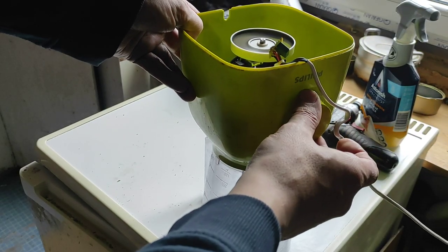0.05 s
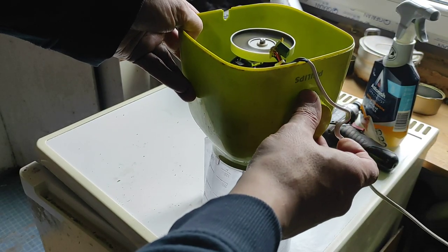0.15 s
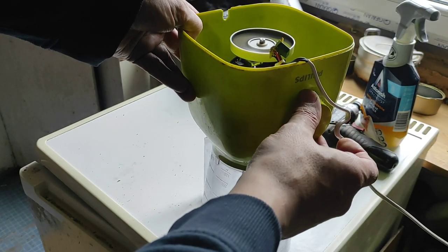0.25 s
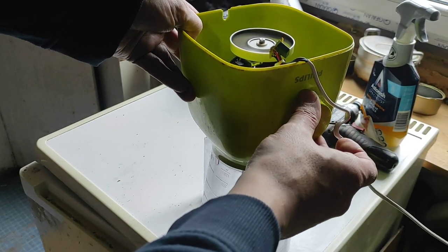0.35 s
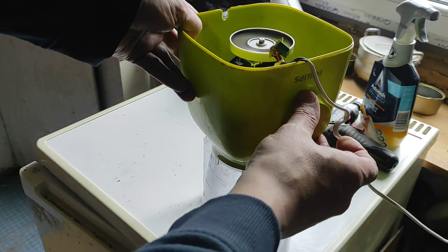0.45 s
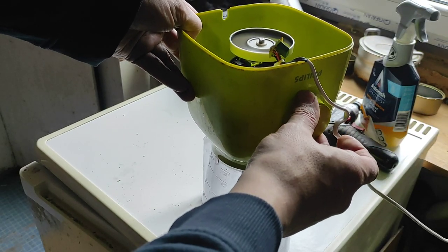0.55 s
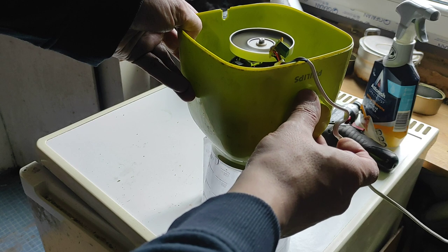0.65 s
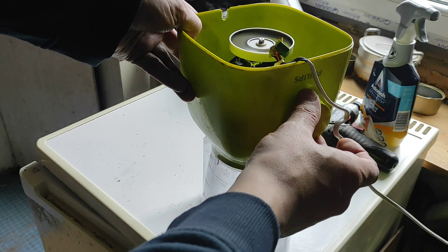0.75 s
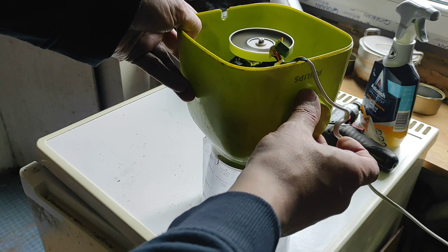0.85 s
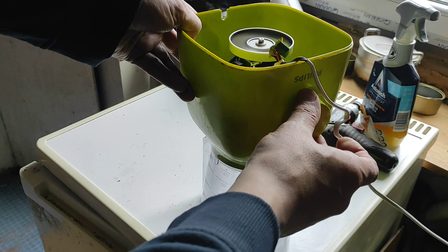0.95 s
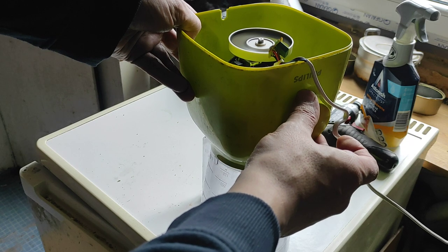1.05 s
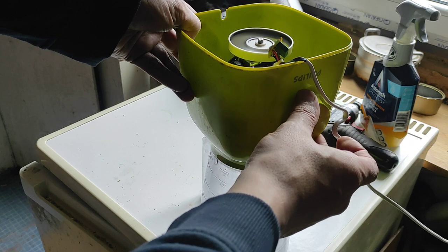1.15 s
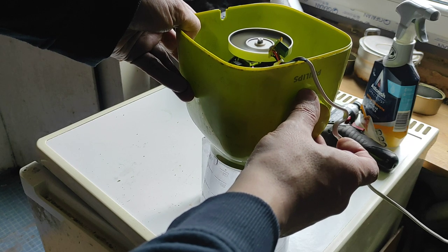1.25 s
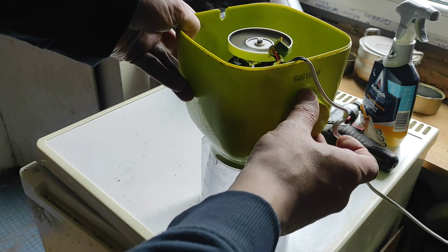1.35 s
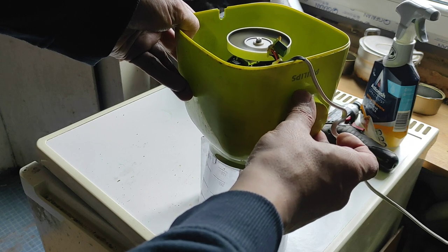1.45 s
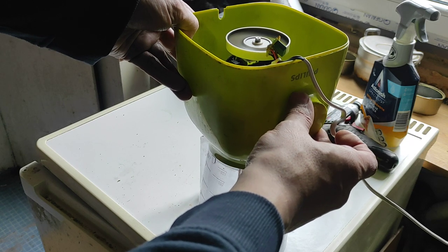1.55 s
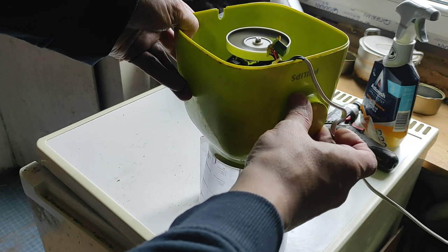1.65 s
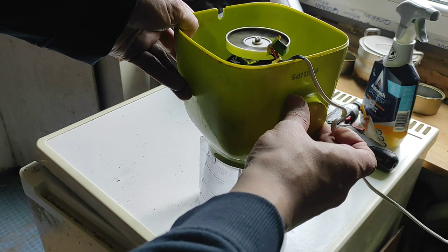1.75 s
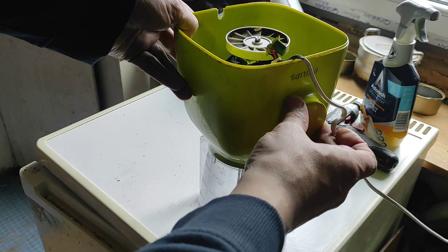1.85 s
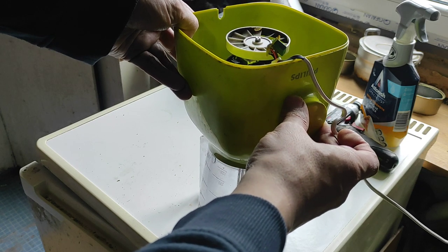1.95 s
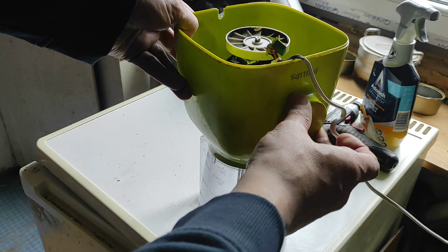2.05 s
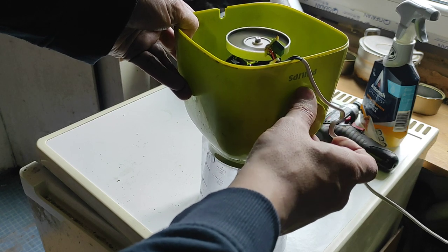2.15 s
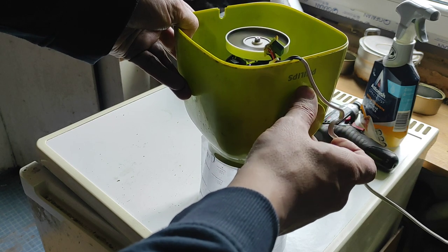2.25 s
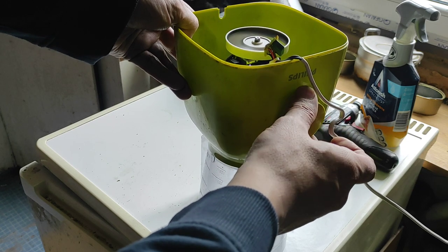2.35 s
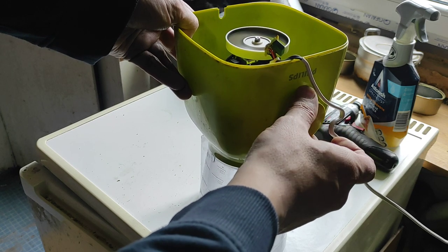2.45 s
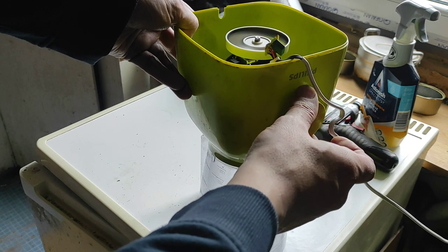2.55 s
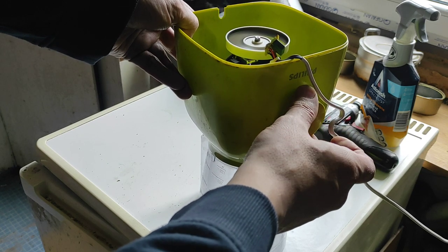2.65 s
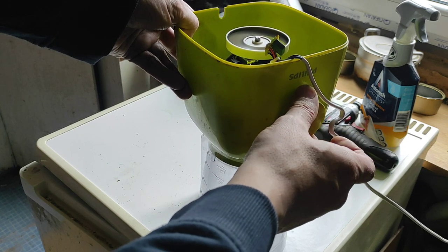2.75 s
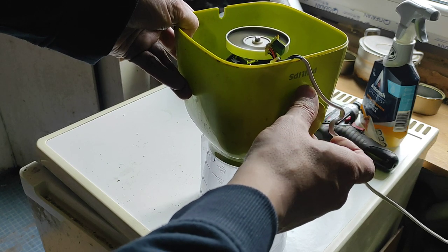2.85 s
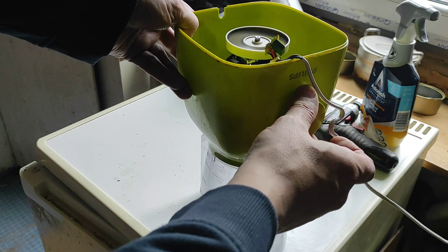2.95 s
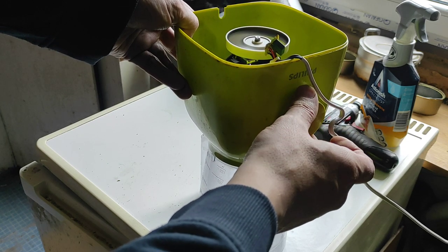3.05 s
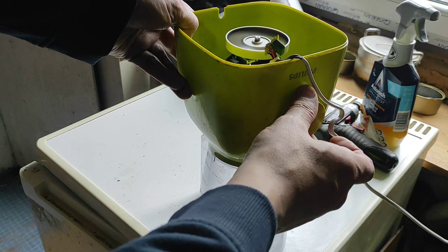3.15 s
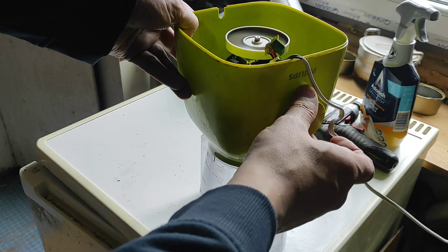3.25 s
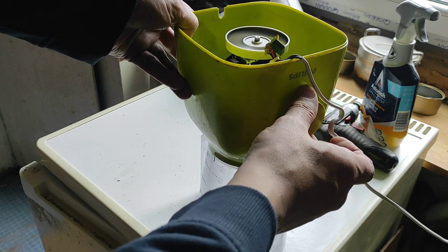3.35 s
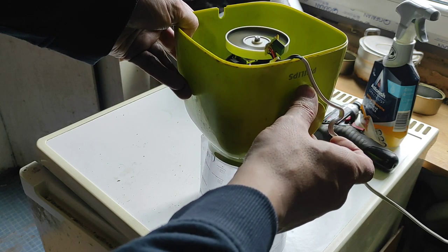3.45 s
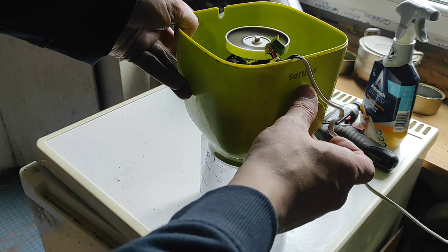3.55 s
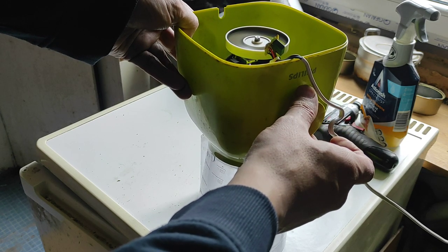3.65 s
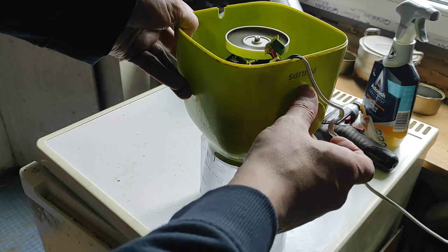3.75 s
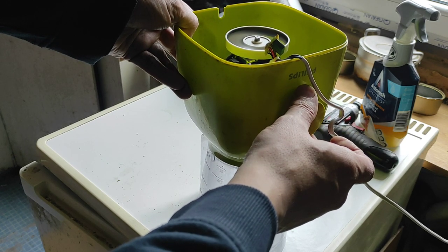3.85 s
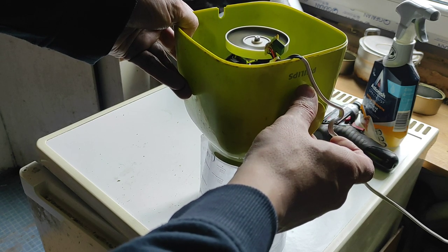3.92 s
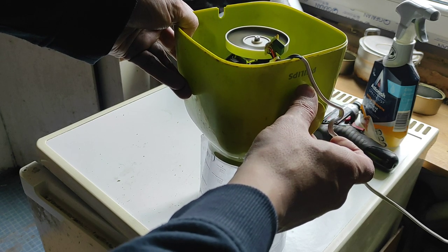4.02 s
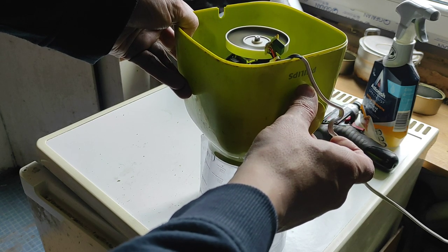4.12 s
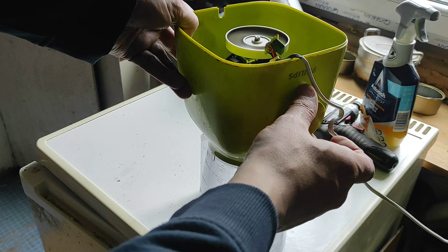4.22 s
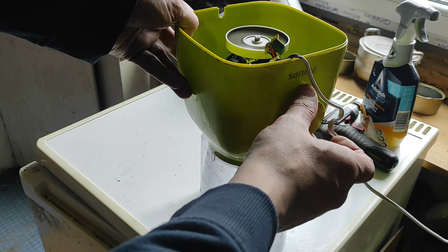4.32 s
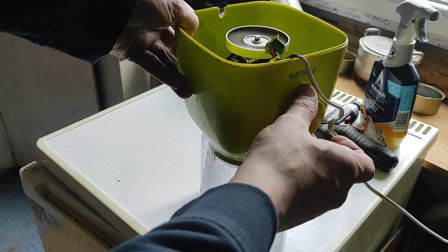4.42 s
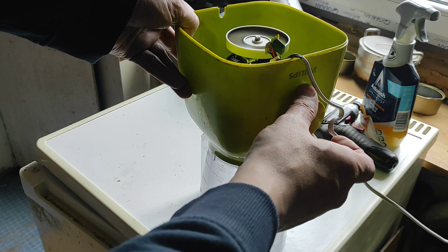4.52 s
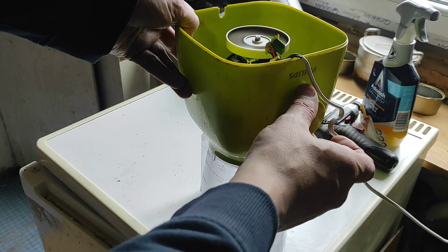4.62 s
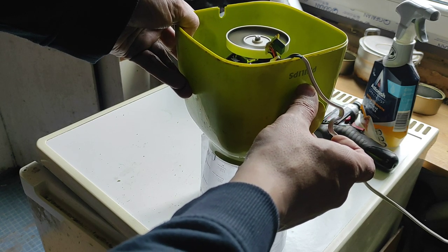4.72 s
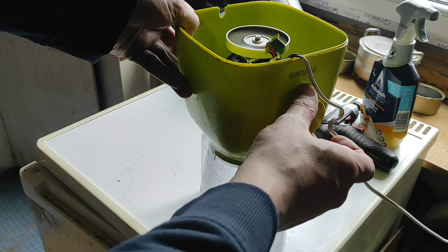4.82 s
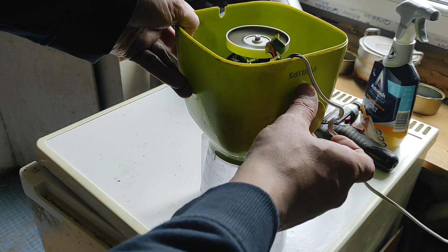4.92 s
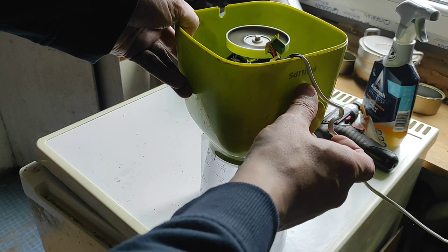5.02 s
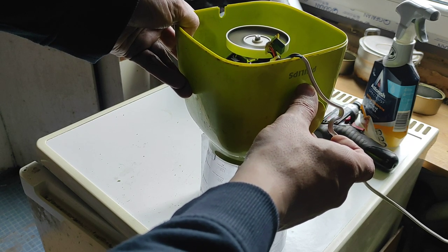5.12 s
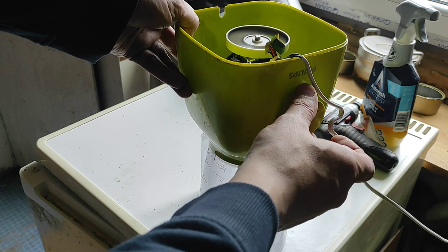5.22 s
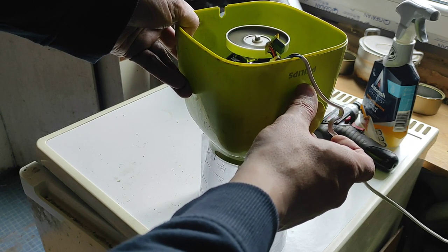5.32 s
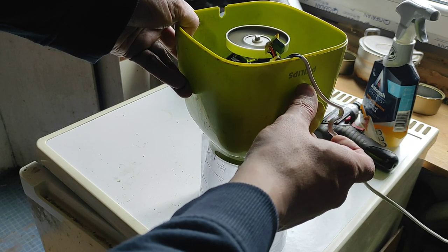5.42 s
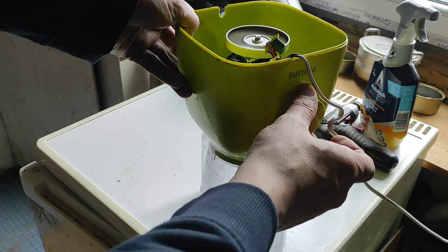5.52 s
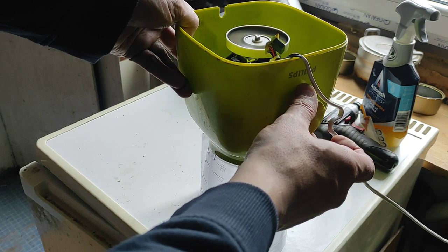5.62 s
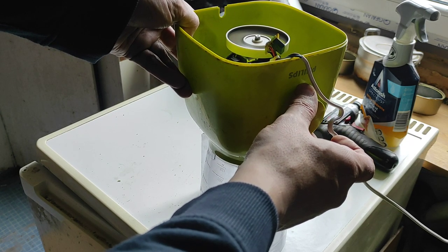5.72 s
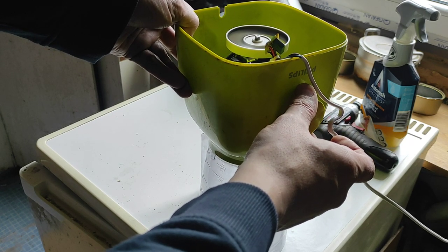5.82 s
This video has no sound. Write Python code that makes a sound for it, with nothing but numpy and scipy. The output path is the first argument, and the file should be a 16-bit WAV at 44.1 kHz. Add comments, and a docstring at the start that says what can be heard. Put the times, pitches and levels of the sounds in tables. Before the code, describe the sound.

Loud, raspy brush and bearing noise from a small electric motor shakes its plastic base on a table. The whine gives way to a clattering, dissonant growl whose tones converge as the shaft brakes. There is a short pause with faint room hum, then a sharp restart thump and rising whine settle into fluctuating, buzzy running. Close stereo pickup, little room echo.

```python
"""Brush and bearing chatter rattles the plastic base of a bare blender motor on a table, close to two microphones
in a small workshop; it is noise, gated by the torque and coloured by the modes of the base.
The commutator whines in sines locked to the shaft. The shaft then whirls in its worn bearing: it knocks once an
orbit, howls in sum and difference tones of orbit and turn, brakes to a stop and is started again.
A still room lies beneath: low noise and one thin steady tone."""
import sys
import numpy as np
from scipy import signal
from scipy.fft import rfft, irfft, next_fast_len
from scipy.io import wavfile
from scipy.ndimage import uniform_filter1d

SR = 44100
rng = np.random.default_rng(int(sys.argv[2]) if len(sys.argv) > 2 else 0)


def how_loud(loudness_db):
    """Turn decibels into a plain amplitude multiplier (0 dB gives 1, 20 dB gives 10)."""
    steps = np.asarray(loudness_db, float) / 20
    return 10 ** steps


def wav_out(sig):
    """Save sig, one row per channel (or a flat mono array), as 16-bit PCM at SR to the path in sys.argv[1]."""
    wavfile.write(sys.argv[1], SR, np.round(np.clip(np.atleast_2d(sig).T, -1, 1) * 32767).astype(np.int16))


N = 259308
T = np.arange(N) / SR
SIZE = next_fast_len(N + SR)
HZ = np.fft.rfftfreq(SIZE, 1 / SR)

# the two runs of the motor: [switched on t/s, at rest t/s, top speed f/Hz]
RUNS = [(-.235, 1.842, 241.2), (2.184, 7, 244.6)]
# whirl of the shaft in its bearing: [t/s, orbit rate f/Hz]
WHIRL = [(1.16, 398.8), (1.3, 416), (1.45, 399), (1.6, 404.4), (1.83, 397), (1.875, 271.5)]
WHIRL_START_S, WHIRL_END_S = 1.178, 1.855
REFERENCE_HZ = 240  # shaft speed to which the speed laws refer
MAINS_HZ = 50.1
ROOM_T60_S = 0.21


def rattle(shaft_hz):
    """Amplitude modulation: mains torque and shaft turns gate the noise of brushes and loose bearings."""
    # broad colour of the rattle: [f/Hz, relative density level/dB]
    colour = [(15, -68), (30, -29.5), (70, -20), (125, -19), (160, -10.5), (300, -11), (500, -10),
              (840, -14.5), (1690, -7.5), (3670, -9), (5960, -4), (8300, -3.5), (9300, -12), (9900, -24),
              (15200, -24.5)]
    mains = 2 * np.pi * MAINS_HZ * T
    half_waves = 0.081 * np.cos(mains)
    full_waves = 0.09 * np.cos(2 * mains)
    beat = 1 + half_waves + full_waves + 0.04 * np.cos(turns(shaft_hz))
    grains = how_loud(3.0 * walk(1500) + 1.0 * walk(60)) * unsteady()
    chatter = beat * running(-18.5, start_db=-11.5, rise_s=0.25, whirl_db=1.5, jolt_db=8, jolt_s=0.011)
    rumble = beat * running(-29.5, start_db=-8.5, rise_s=0.13, whirl_db=0.5, jolt_db=13.2, jolt_s=0.07)
    # the deepest rumble comes from the unbalance and grows with speed
    shaking = how_loud(-46.5) * (shaft_hz / REFERENCE_HZ) ** 1.4

    # power shares below three crossover frequencies
    deep, low, below_air = (1 / (1 + (HZ / hz) ** 8) for hz in (144, 1200, 7770))
    gain = base(colour, column=2)
    body = shaken(chatter * grains, gain * np.sqrt((1 - low) * below_air))
    # the top of the chatter ignores 0.94 of the level swings
    air = how_loud(-8.5) * shaken(chatter * grains ** (1 - 0.94), gain * np.sqrt(1 - below_air))
    bass = shaken(rumble, gain * np.sqrt(low * (1 - deep)))
    return body + air + bass + shaken(shaking, gain * np.sqrt(deep))


def running(db, start_db, rise_s, whirl_db, jolt_db, jolt_s):
    """Exponential relaxation: the rotor jumps when switched on, is weak at low speed, then steady."""
    gain = 0
    for on, rest, _ in RUNS:
        age = (T - on).clip(0)
        approach_db = start_db * np.exp(-age / rise_s)
        gain = gain + hold(on, rest) * how_loud(approach_db + jolt_db * np.exp(-age / jolt_s))
    return gain * how_loud(db + whirl_db * hold(WHIRL_START_S, WHIRL_END_S))


def unsteady():
    """Slack and catch: the chatter sags, catches, overshoots and relaxes, with a slight random wander."""
    # slackenings of the chatter: [catch t/s, slack before it t/s, depth level/dB, overshoot level/dB]
    catches = [(.051, 0.017, -7, 6), (.115, 0.072, 3, 1.5), (.168, 0.068, 0.5, 4.5), (.683, 0.13, 1.5, 3),
               (.737, 0.065, 2.5, 2.5), (.9, .03, 0, 9.5), (1.07, 0.22, 2.5, 0), (2.345, 0.061, 1.5, 0.5),
               (2.429, .06, 1.5, -1), (2.9, 0.15, 2.5, 1), (3.02, 0.08, 2.5, 3.5), (3.1, 0.073, 4, 1),
               (3.168, 0.059, 3, 3.5), (3.26, 0.1, 4, 3), (3.35, 0.091, 3.5, 3.5), (3.489, 0.24, 3, 0),
               (3.58, .06, 3.5, -2.5), (3.69, 0.077, 1, 2.5), (3.785, .07, 3.5, 5.5), (3.95, 0.26, 4, 2),
               (4.078, 0.11, 4, 5), (4.256, 0.23, 1.5, 3.5), (4.395, 0.17, 5, 1), (4.73, 0.077, 7, 1),
               (4.945, 0.24, 2.5, 3.5), (5.125, 0.13, 4, 0.5), (5.42, 0.064, 2.5, 0), (5.797, 0.17, 3, 2.5)]
    catch_s, settle_s = 0.019, 0.035  # length of the catching ramp, time constant of the overshoot
    db = -0.14 * walk(20)
    for at, slack, depth_db, over_db in catches:
        corners = [at - slack, at - slack / 3, at - catch_s / 2, at + catch_s / 2]
        sag = np.interp(T, corners, [0, 1, 1, 0])
        overshoot = (T > at) * np.exp(-(T - at).clip(0) / settle_s)
        db = db - depth_db * sag + over_db * overshoot
    return how_loud(db)


def whine(shaft_hz):
    """Order tones: unbalance and commutator sound at multiples of the shaft rate, growing as its square."""
    # unbalance, then tones around the 24 commutator bars and upward:
    # [multiple of shaft rate, relative level/dB, share of pitch waver]
    orders = [(1.001, -36, 0.00072), (23.4, -53, .003), (24.14, -31.5, 0.0045), (24.3, -48, 0.0047),
              (47.4, -50, .004), (48.04, -41.5, .004), (48.6, -50, .004), (59, -58, .004)]
    # the whine dies when the whirl takes over
    driven = (shaft_hz / REFERENCE_HZ) ** 2 * (1 - hold(WHIRL_START_S, WHIRL_END_S))
    tones = 0
    for order, db, waver in orders:
        phase = order * turns(shaft_hz * (1 + waver * walk(60)))
        level = how_loud(db + 2.0 * walk(16))
        tones = tones + level * np.sin(phase + rng.uniform(0, 1.1, (2, 1)))
    # the uneven half waves of the mains add a lower sideband to the unbalance
    sideband = how_loud(orders[0][1] - 14.0) * np.sin(turns(shaft_hz - MAINS_HZ))
    return np.sqrt(2) * driven * (tones + sideband)


def knocks(shaft_hz):
    """Periodic impact: the whirling shaft strikes its bearing once an orbit and the base rings."""
    # broad colour of the knocks: [f/Hz, relative density level/dB]
    colour = [(71, -48), (120, -43), (177, -39.5), (481, -10), (637, -27), (818, -17), (2190, -11.5),
              (2400, -7), (5000, -14), (6500, -55.5), (11000, -120)]
    pulses = np.exp(0.93 * np.cos(turns(curve(WHIRL))))
    blows = unit(pulses * how_loud(0.43 * walk(80)))
    # the first knocks are harder; all weaken as the shaft slows
    first_db = 3.5 * np.exp(-(T - WHIRL_START_S).clip(0) / 0.025)
    force = (0.17 + shaft_hz / REFERENCE_HZ) ** 0.85 * hold(WHIRL_START_S, WHIRL_END_S)
    return shaken(how_loud(-17 + first_db) * force * blows, base(colour, column=3))


def howl(shaft_hz):
    """Intermodulation: orbit and turn beat into tones that close in on each other as the shaft slows."""
    # combination tones: [multiple of orbit rate, multiple of shaft rate, relative level/dB]
    combinations = [(0, 1, -13), (1, -1, -11), (1, 0, -9), (1, 1, -7), (2, -1, -2.5), (2, 1, -8),
                    (3, 0, -10), (4, -2, -10), (4, -1, -5), (5, -1, -4), (5, 0, -14), (6, -1, 0),
                    (7, -1, -8)]
    orbit = turns(curve(WHIRL) * (1 + 0.003 * walk(50)))
    turn = turns(shaft_hz)
    # below 140 turns a second the tones fade, the more so the higher their orbit multiple
    fade_db = 1.5 * (1 - shaft_hz / 140).clip(0) / 3.5
    tones = 0
    for m, n, db in combinations:
        level = how_loud(db - m * fade_db + 3.5 * walk(15.27))
        tones = tones + level * np.sin(m * orbit + n * turn + rng.uniform(0, 1.0, (2, 1)))
    return np.sqrt(2) * how_loud(-27) * hold(WHIRL_START_S, 1.86, rise_s=0.03) * tones


def shaft():
    """Rotor dynamics: each run climbs fast, then creeps to top speed in Hz; whirl brakes the first."""
    # braking of the shaft by the whirl: [t/s, shaft speed f/Hz]
    braking = [(1.17, 244), (1.24, 228), (1.39, 180), (1.6, 160), (1.66, 134), (1.83, 14.9), (1.87, 1)]
    spin_up_s, creep_s, creep_share = 0.155, 0.8, 0.095
    free = 0
    for on, rest, top_hz in RUNS:
        age = (T - on).clip(0)
        quick = (1 - creep_share) * np.exp(-age / spin_up_s)
        slow = creep_share * np.exp(-age / creep_s)
        share = (1 - (quick + slow)).clip(0)
        free = free + top_hz * share * (T < rest)
    second_on = RUNS[1][0]
    return np.where(T < second_on, np.minimum(free, curve(braking)), free)


def hold(start, end, rise_s=0.009):
    """Exponential onset and decay: a gain that rises from the start and dies away after the end."""
    return (1 - np.exp(-(T - start).clip(0) / rise_s)) * np.exp(-(T - end).clip(0) / 0.014)


def base(colour, column):
    """Modal resonance: a broad colour, lifted at the modes and hollowed where paths cancel."""
    # modes of base and table: [f/Hz, width f/Hz, lift in rattle level/dB, lift in knocks level/dB]
    modes = [(239, 10, -4, 5), (400, 31, 6.5, 10.3), (547.5, 14.8, 16, 7), (632, 52, 9, 5),
             (763, 4.4, 9.5, 8), (962, 40, 4, 2), (1216, 13, 6.5, 15), (1390, 11, 10, 3), (1603, 40, 6, 2),
             (1711.5, 23, 12.5, 3.4), (1910, 68, 7.5, 12), (1983, 26, 2, 6), (2116, 25.4, 11, 22),
             (2282, 23, 2.5, 5), (2240, 13, 10.5, 5), (2696, 9.8, 10.5, 3.6), (2818, 27, 5, 2.8),
             (3248, 74, 4.5, 11), (3462, 25, 10.5, 2), (4006, 35, 9.5, 2), (5123, 26, 7.5, 2),
             (5944, 110, 7.5, 2), (5790, 100, -2.5, 2), (6860, 16, 10, 5), (7200, 220, 5.5, 2),
             (7610, 30, 9.5, 2)]
    # cancellations between base and table top, a negative depth lifts: [f/Hz, width f/Hz, depth level/dB]
    cancellations = [(868, 320, -1), (2644, 95, 3), (3100, 50, 11.5), (3690, 156, 7), (5020, 54, 14)]
    lift = 1
    for mode in modes:
        peak = (how_loud(mode[column]) ** 2 - 1).clip(0)
        lift = lift + peak / (1 + (2 * (HZ - mode[0]) / mode[1]) ** 2)
    dip_db = sum(db / (1 + (2 * (HZ - hz) / width) ** 2) for hz, width, db in cancellations)
    return how_loud(over_hz(colour) - dip_db) * np.sqrt(lift)


def shaken(gate, gain):
    """Energy decay: gated noise passes through the base and its power lingers in the room."""
    keep = np.exp(-np.log(1e6) / (ROOM_T60_S * SR))
    lingering = signal.lfilter([1 - keep], [1, -keep], gate ** 2)
    pair = spread(np.sqrt(gate ** 2 + how_loud(-2.5) ** 2 * lingering))
    return causal(pair, gain / np.sqrt(2 * np.mean(gain ** 2)))


def spread(gate):
    """Spatial coherence: gated noise is alike in the bass, looser and phase-shifted in the treble."""
    # balance of the microphones: [f/Hz, left minus right level/dB]
    balance = [(60, 11), (110, -5.5), (200, 12), (380, 1.5), (690, 0.5), (1280, 6), (2360, -1), (4350, 0.5),
               (8020, 0), (14800, -3.5)]
    # coherence of the microphones: [f/Hz, share alike left and right]
    likeness = [(60, 1), (250, 0.91), (700, 0.81), (1500, 1), (3000, 0.32), (6000, 0.25), (12000, 0.15)]
    # phase between the microphones: [f/Hz, lead of the left phase/rad]
    lead = [(400, -0.58), (2150, -1), (4220, 2.2), (5340, -2.7), (5860, 3), (6120, 0.54), (8010, 1.37),
            (8790, -2.5), (10500, -11), (11500, -0.5), (12200, -10.5), (13100, -15.5), (13900, -26),
            (15000, -24.5)]
    alike = over_hz(likeness).clip(0, 1)
    mid, side = rfft(gate * rng.standard_normal((2, N)), SIZE)
    sign = np.array([[1], [-1]])  # left, right
    ports = how_loud(sign * over_hz(balance) / 2) * np.exp(.5j * sign * over_hz(lead))
    pair = mid * np.sqrt(1 + alike) + sign * side * np.sqrt(1 - alike)
    return irfft(pair * ports, SIZE)[:, :N]


def room(dry, wet_db):
    """Reverberation: convolution with a short, dense decaying tail, different at each microphone."""
    t = T[:SR // 2]
    decay = np.exp(-np.log(1000) * t / ROOM_T60_S) * (t > .004)
    tail = rng.standard_normal((2, len(t))) * decay
    tail = tail / np.sqrt((tail ** 2).sum(axis=1, keepdims=True))
    return dry + how_loud(wet_db) * signal.fftconvolve(dry, tail, axes=1)[:, :N]


def quiet():
    """Stationary background: low filtered noise of the still workshop and one thin steady tone."""
    # colour of the quiet room: [f/Hz, relative density level/dB]
    colour = [(15, -37), (25, -3.5), (90, -20), (241, -9), (934, -29), (1080, -21.5), (1320, -27),
              (9000, -26.5), (11700, -68.5), (19800, -120)]
    air = unit(causal(spread(1), how_loud(over_hz(colour))))
    tone = np.sqrt(2) * np.sin(2 * np.pi * 1100 * T)
    return how_loud(-62) * air + how_loud(-69.5) * tone


def curve(rows):
    """Linear interpolation in time: the second column of a table at every sample."""
    rows = np.array(rows)
    return np.interp(T, rows[:, 0], rows[:, 1])


def over_hz(points):
    """Interpolation over log frequency: the second column of a table at every frequency."""
    points = np.array(points)
    return np.interp(np.log(HZ + 1), np.log(points[:, 0]), points[:, 1])


def causal(x, gain):
    """Minimum phase: the folded cepstrum gives the shortest ring that the gain allows."""
    cepstrum = irfft(np.log(gain + 1e-9), SIZE)
    cepstrum[1:SIZE // 2] *= 2
    cepstrum[SIZE // 2 + 1:] = 0
    return irfft(rfft(x, SIZE) * np.exp(rfft(cepstrum)), SIZE)[..., :N]


def unit(x):
    """Normalisation of the mean power: rms 1."""
    return x / np.sqrt(np.mean(x ** 2))


def walk(rate):
    """Smoothed random process: levels held 1 / rate s and slewed twice; spread near 1."""
    k = int(SR / rate)
    held = np.repeat(rng.standard_normal(N // k + 1), k)
    return 1.368 * uniform_filter1d(uniform_filter1d(held, k), k)[:N]


def turns(hz):
    """Phase in radians as the integral of a changing rate."""
    return 2 * np.pi * np.cumsum(hz) / SR


def scene():
    """Superposition: rattle, knocks and tones of the motor add to the quiet of the room."""
    # how strongly the base passes tones on: [f/Hz, level/dB]
    tone_lift = [(140, -19.5), (190, 4), (245, -3), (560, 1), (750, 8), (1200, -4), (2150, 4), (2400, 5.5),
                 (3800, -14.5), (4600, -3), (5300, 7.5), (5800, -4), (9000, -6)]
    shaft_hz = shaft()
    tones = causal(whine(shaft_hz) + howl(shaft_hz), how_loud(over_hz(tone_lift)))
    return rattle(shaft_hz) + knocks(shaft_hz) + room(tones, wet_db=-12) + quiet()


def low_pass(x):
    """Removes everything above the highest recorded frequency."""
    return signal.sosfilt(signal.butter(12, 15380, fs=SR, output="sos"), x)


def record(dry):
    """Saturation: the recorder clips any peak beyond full scale."""
    clipped = np.clip(dry, -1, 1)
    return low_pass(clipped)


dry = scene()
out = record(dry)
wav_out(out)
```